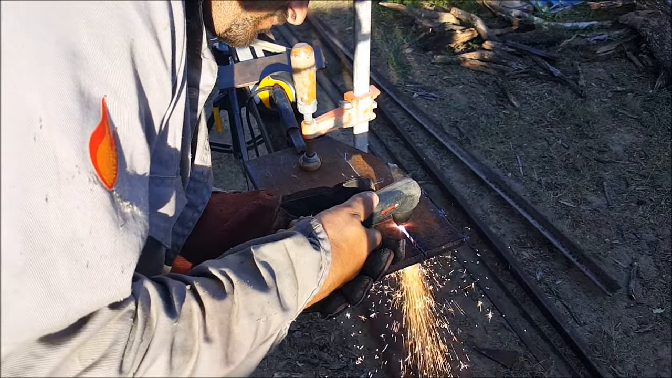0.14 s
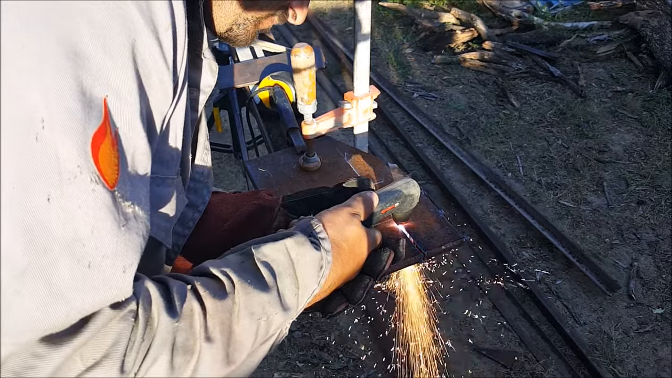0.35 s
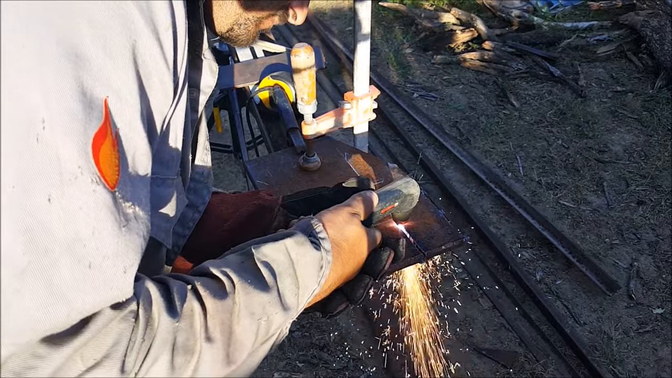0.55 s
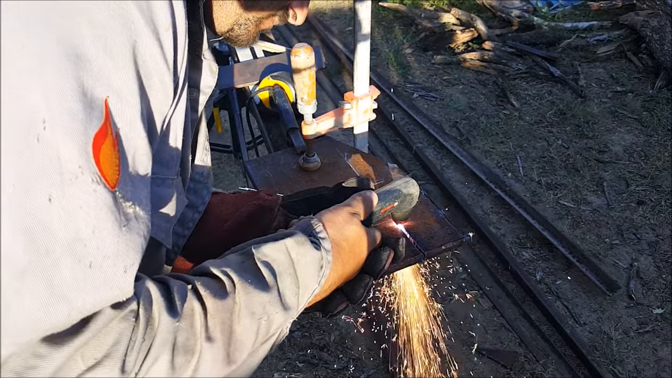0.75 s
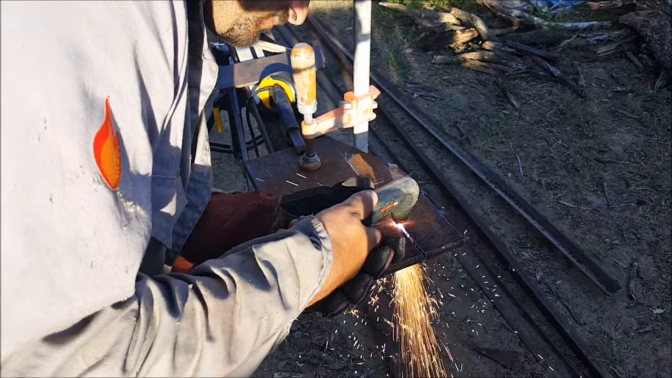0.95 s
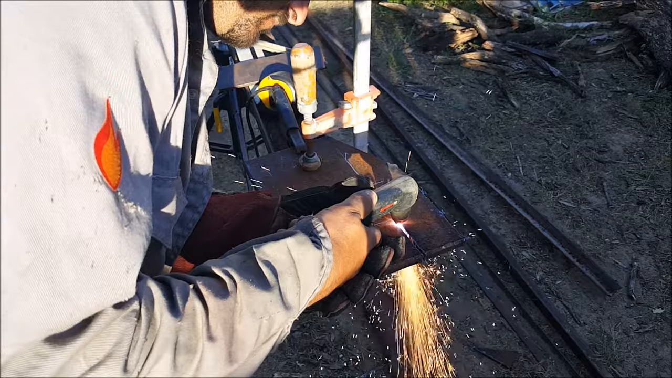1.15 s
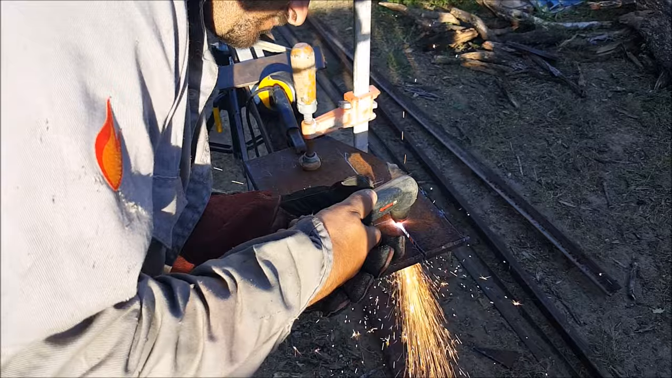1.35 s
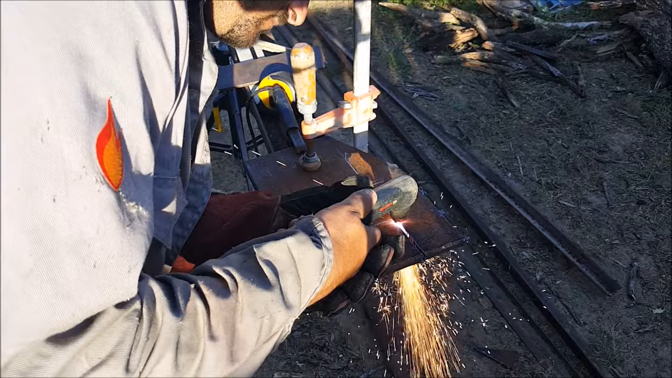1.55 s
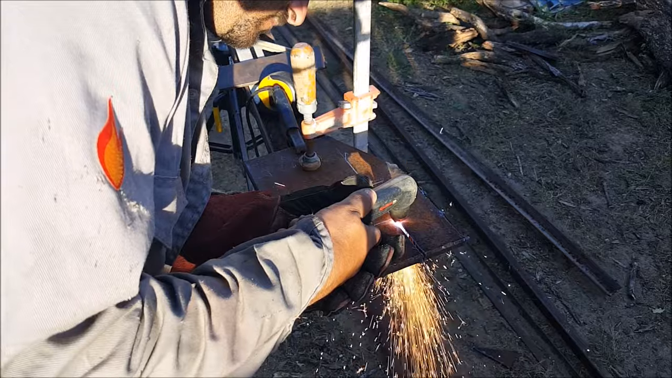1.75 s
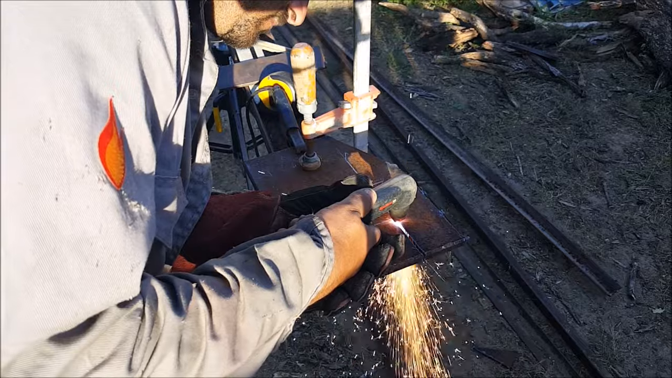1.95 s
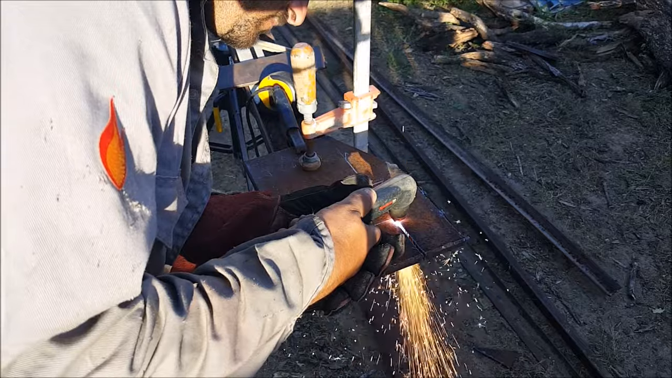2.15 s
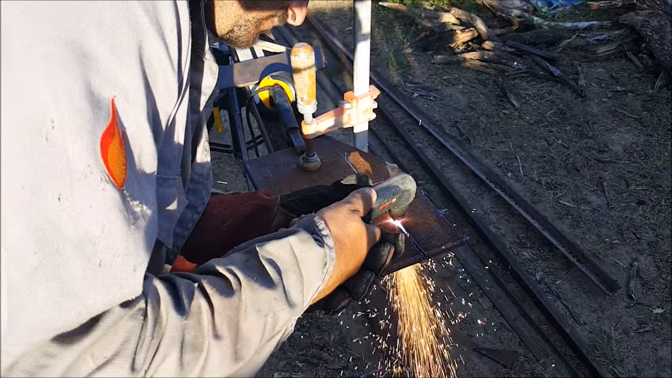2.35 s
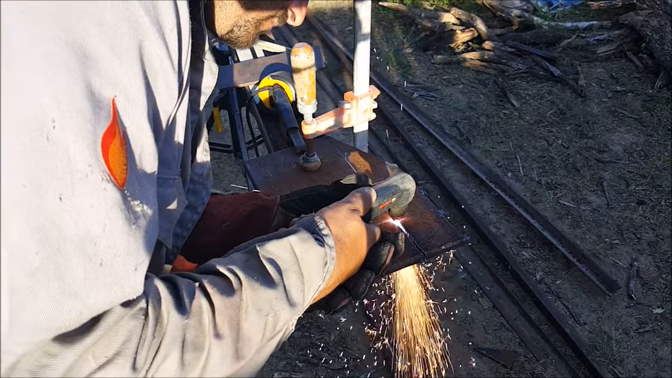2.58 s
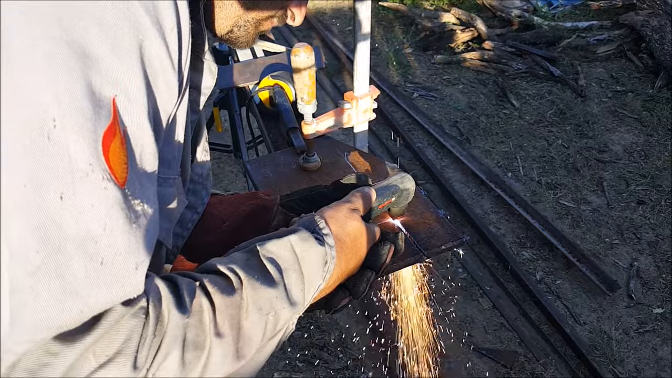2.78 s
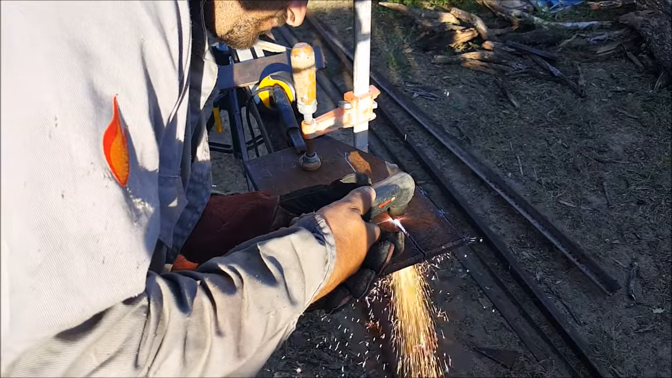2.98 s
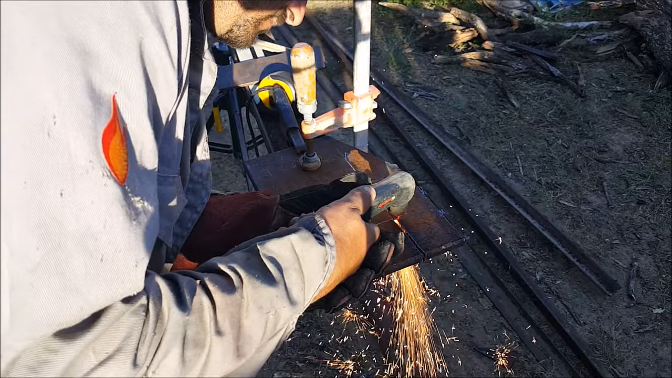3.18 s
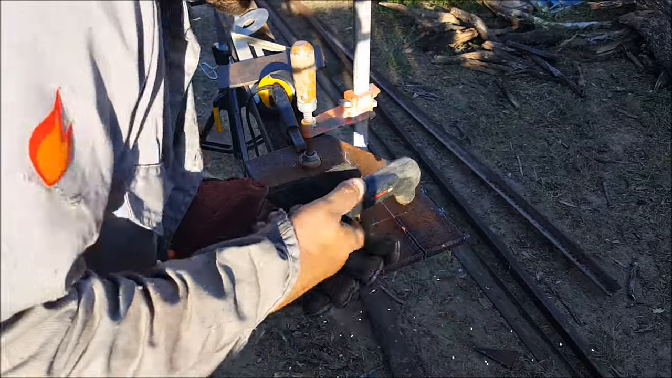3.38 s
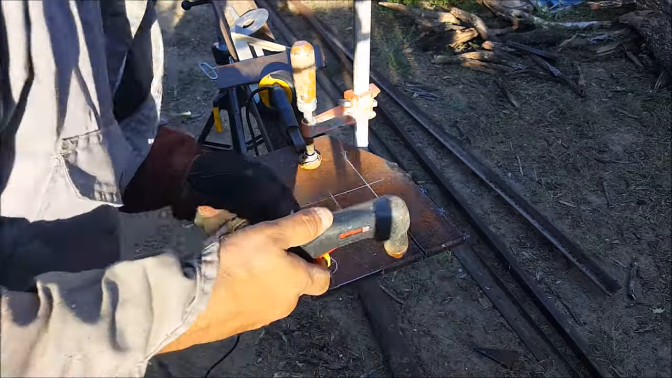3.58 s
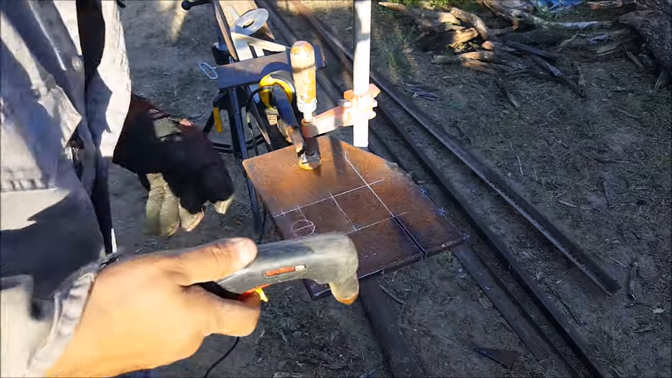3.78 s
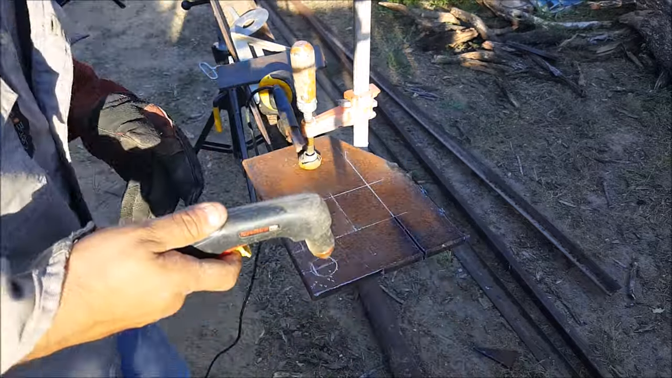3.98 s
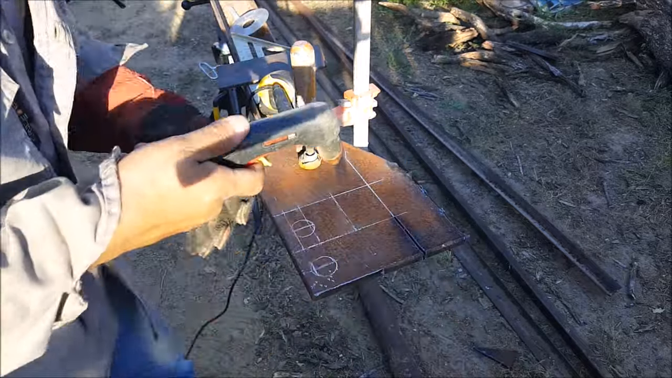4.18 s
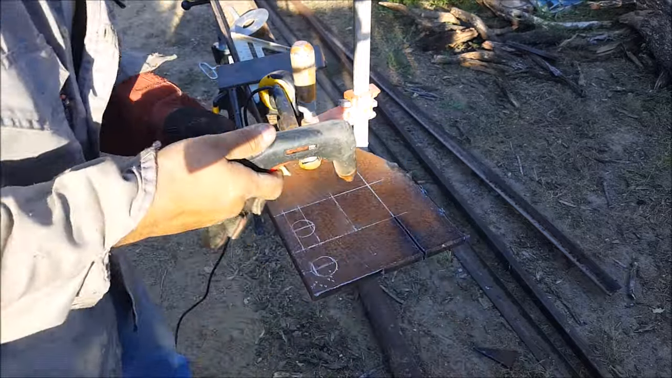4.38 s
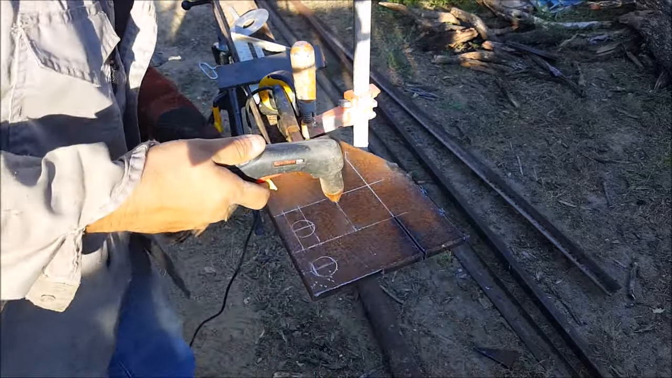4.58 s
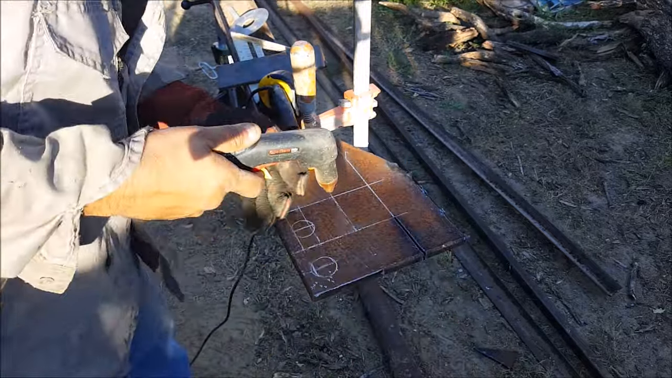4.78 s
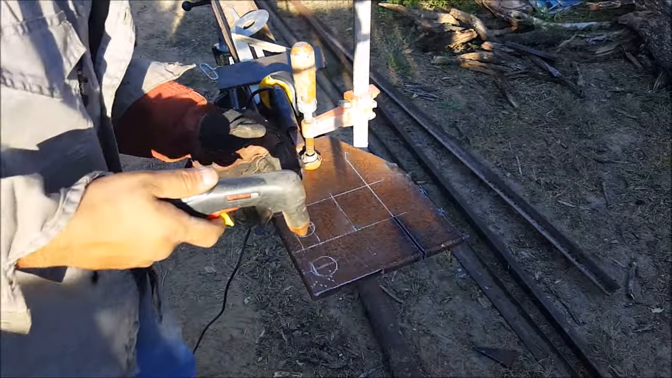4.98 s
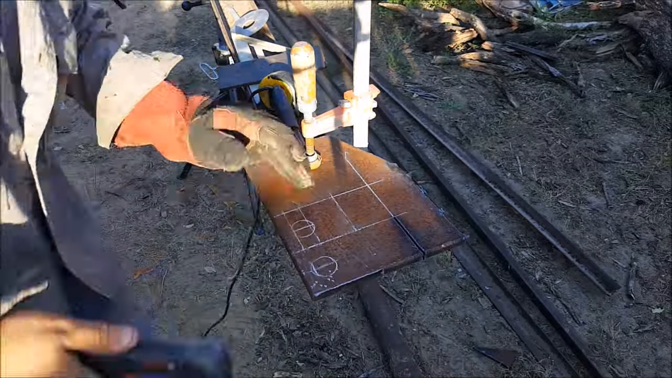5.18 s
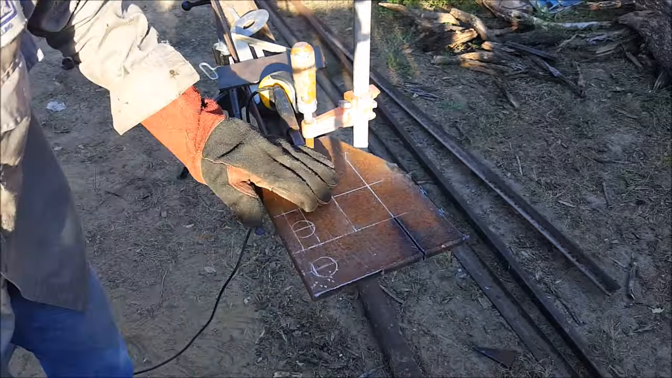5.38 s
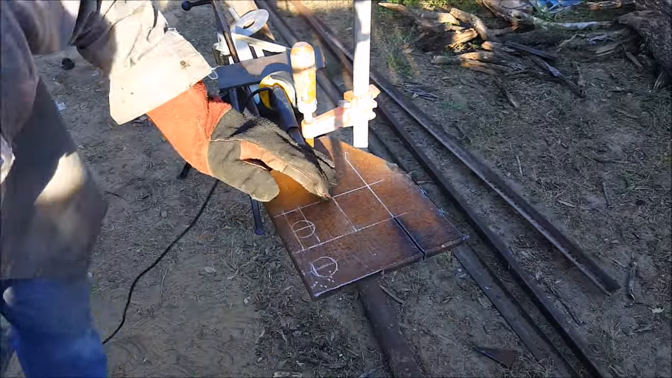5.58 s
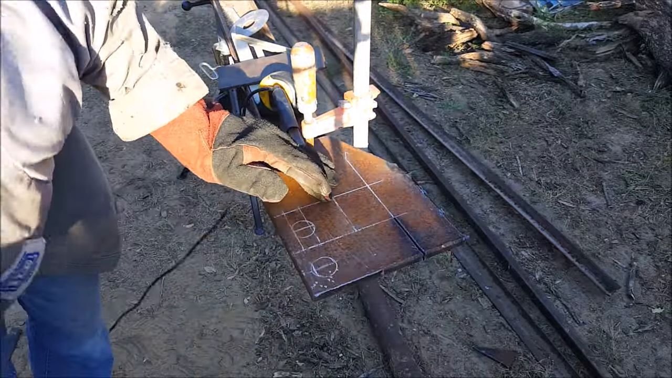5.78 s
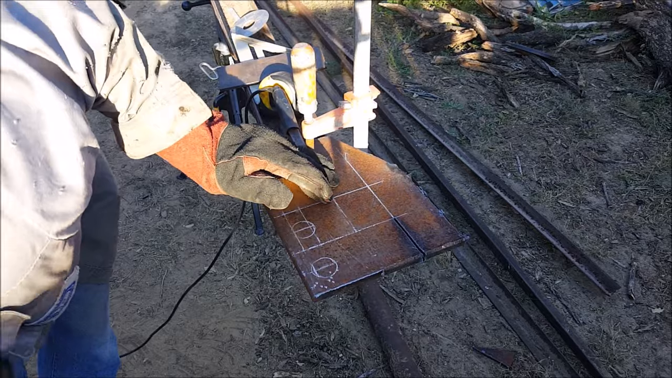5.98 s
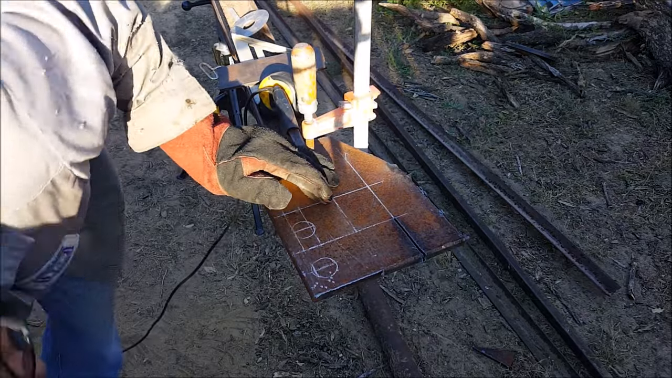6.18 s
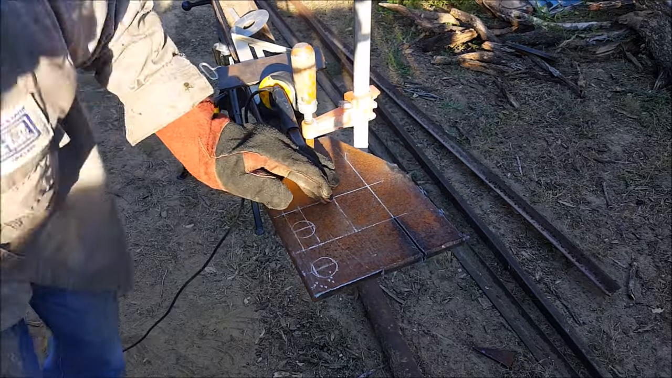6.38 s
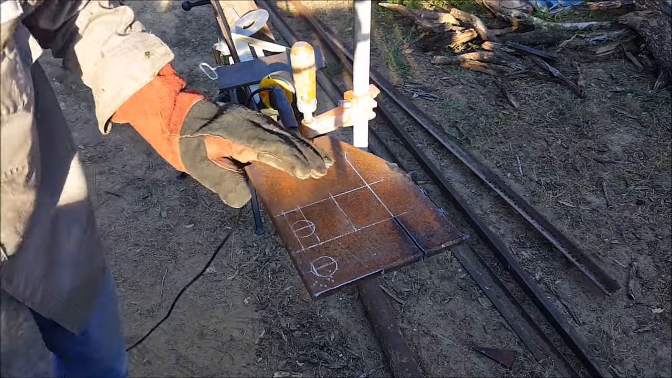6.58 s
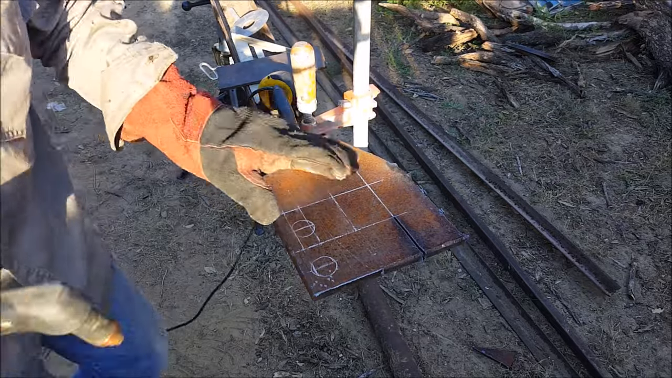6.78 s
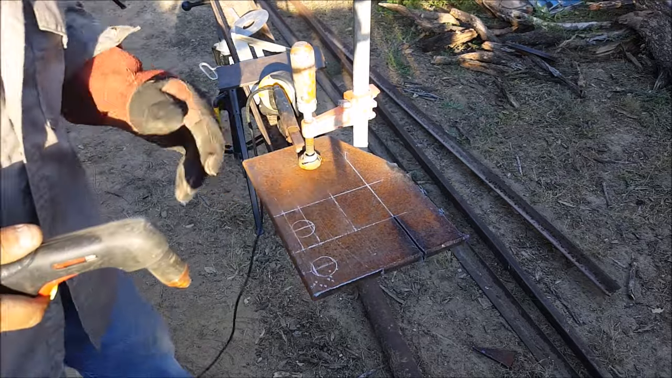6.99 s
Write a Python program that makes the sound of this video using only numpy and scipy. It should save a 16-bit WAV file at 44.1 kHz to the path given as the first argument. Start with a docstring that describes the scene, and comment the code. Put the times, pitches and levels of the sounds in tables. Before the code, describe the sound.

A loud, continuous plasma cut opens at once, its roar flickering with tiny dips and flares. It stops dead after about three seconds. What remains is a thin jet of air from the torch, weak at first, then stronger, fading and returning, with brief fluttering whooshes as it crosses the plate's edge. Low wind buffets the close stereo microphone in dry open air.

```python
"""A plasma torch cuts steel plate outdoors, close to two microphone ports: kicked noise roars in the kerf, jet noise hisses.
The arc goes out with a short tail; cooling air blows on, as jet noise whose colour and delay between the ports
follow the torch as it is lifted, swung over the plate's edge, lowered and brought back. A brief faint whistle, then
bands of rough noise gliding in pitch, come from the jet; lumps of low noise buffet the ports like light wind after
the cut; a machine fan, an unsteady sine, whines faintly."""
import sys
import numpy as np
from scipy import signal
from scipy.fft import rfft, irfft, next_fast_len
from scipy.io import wavfile
from scipy.ndimage import uniform_filter1d, map_coordinates

SR = 44100
rng = np.random.default_rng(int(sys.argv[2]) if len(sys.argv) > 2 else 0)


def file_out(sig):
    """Save sig as 16-bit WAV at sys.argv[1]."""
    # one column per channel
    cols = np.atleast_2d(sig).T
    # limit, then scale
    lim = np.clip(cols, -1, 1)
    pcm = np.round(lim * 32767).astype(np.int16)
    wavfile.write(sys.argv[1], SR, pcm)


N = 310464
TIME_S = np.arange(N) / SR
ARC_OUT_S = 3.294


def amp(db):
    """dB to gain."""
    return 10 ** (np.asarray(db) / 20)


def unit(x):
    """Scale to rms 1 over all channels."""
    return x / np.sqrt(np.mean(x ** 2) + 1e-20)


def columns(rows, hz):
    """Interpolate every column after the frequency on a log frequency axis."""
    row_hz, *cols = np.transpose(rows)
    return [np.interp(np.log(hz + 1), np.log(row_hz + 1), col) for col in cols]


def curves(rows):
    """Interpolate every column after the time, one value per sample."""
    row_s, *cols = np.transpose(rows)
    return [np.interp(TIME_S, row_s, col) for col in cols]


def bumps(rows):
    """Sum bell-shaped rises or dips in dB from rows of centre s, height dB, half-length s (to 1/e)."""
    return sum(db * np.exp(-((TIME_S - s) / half_s) ** 2) for s, db, half_s in rows)


def wobble(knots_per_s):
    """Smooth random curve through normally distributed knots."""
    knots = rng.standard_normal(int(N * knots_per_s / SR) + 4)
    return map_coordinates(knots, [np.arange(N) * knots_per_s / SR])


def filtered(x, response):
    """Multiply the spectrum of x by a response of frequency."""
    m = next_fast_len(N + 8192)
    return irfft(rfft(x, m) * response(np.fft.rfftfreq(m, 1 / SR)), m)[..., :N]


def below(x, edge_hz, power):
    """Zero-phase low-pass, gain one half at the edge."""
    return filtered(x, lambda hz: 1 / (1 + (hz / edge_hz) ** power))


def coloured(x, spectrum):
    """Shape x by a spectrum of Hz, dB rows; rms 1."""
    return unit(filtered(x, lambda hz: amp(columns(spectrum, hz)[0])))


def patchy(patchy_db):
    """Two white noises under one field of random gain in time and pitch."""
    z = signal.stft(rng.standard_normal((2, N)), nperseg=512)[2]
    field = rng.standard_normal(z.shape[1:])
    field = uniform_filter1d(field, size=6, axis=0)
    field = uniform_filter1d(field, size=10, axis=1)
    return signal.istft(z * amp(patchy_db * unit(field)), nperseg=512)[1][:, :N]


def mixed(a, b, alike):
    """Left and right mixes of two independent noises, with correlation alike."""
    angle = np.arccos(np.clip(alike, -1, 1)) / 2
    return np.cos(angle) * a + np.sin(angle) * b, np.cos(angle) * a - np.sin(angle) * b


def blend(alike, patchy_db):
    """Left and right patchy noise that share a part."""
    a, b = patchy(patchy_db)
    return np.array(mixed(a, b, alike))


def nozzle(ports, patchy_db):
    """Jet hiss with the colour, likeness and phase of the two ports; rms 1 between 6 and 10 kHz."""
    m = next_fast_len(N + 8192)
    hz = np.fft.rfftfreq(m, 1 / SR)
    left_db, right_db, alike, lead_rad = columns(ports, hz)
    bass_cut = np.clip(hz / ports[0][0], 0, 1) ** 2  # a small jet makes no bass
    a, b = rfft(patchy(patchy_db), m) * bass_cut
    left, right = mixed(a, b, np.clip(alike, 0, 1))
    left = amp(left_db) * left * np.exp(.5j * lead_rad)
    right = amp(right_db) * right * np.exp(-.5j * lead_rad)
    both = np.array([left, right])
    treble = irfft(both * ((hz > 6000) & (hz < 10000)), m)[:, :N]
    return irfft(both, m)[:, :N] / np.std(treble)


def fan():
    """Blade tone, slightly unsteady in pitch and level, rising out of the quiet."""
    # Each row: pitch in Hz, rms level in dB before the unsteadiness and the rise.
    blade_tones = [(570.6, -62)]
    drift_s = np.cumsum(1 + 0.0015 * wobble(6)) / SR
    tone = 0
    for hz, db in blade_tones:
        tone = tone + amp(db + 2.1 * wobble(8)) * np.sqrt(2) * np.sin(2 * np.pi * hz * drift_s)
    rise_db = np.interp(TIME_S, [3.9, 4.3, 5.3, 5.6], [-13, -4, -1, 0.0])
    return tone * amp(rise_db)


def wind():
    """Lumps of turbulence press on the ports, partly their own; heard only after the arc."""
    # Each row: time in s, buffet level in dB, extra below 85 Hz in dB.
    wind_levels = [(3.3, -75, 0), (3.45, -75, 0), (3.6, -59, -3), (3.95, -61, -2), (4.05, -43, -9),
                   (4.3, -41.5, -7), (4.8, -51, 2), (5.1, -54, 5), (5.6, -47, 1), (6.0, -53, 5),
                   (6.6, -50, 2), (6.8, -57, 4), (7.04, -56, 3)]
    # Buffet spectrum. Each row: frequency in Hz, density in dB per Hz.
    buffet_spectrum = [(15, -42), (35, -6), (60, 0.5), (110, 4), (170, -4), (260, -12.5), (500, -46)]
    # Strong gusts. Each row: centre in s, rise over the buffeting in dB, half-length in s.
    gust_rows = [(4.025, 6, .015), (4.12, 7, .025), (4.55, 6, .02), (4.97, 9, 0.061), (5.32, 8, 0.016),
                 (5.55, 7, .02), (5.62, 10, 0.036), (5.72, 4, .015), (5.875, 10, 0.022), (6.035, 8.5, .015),
                 (6.13, 5, .02), (6.31, 8, .015), (6.72, 5, .02)]
    buffet_db, deep_db = curves(wind_levels)
    lumps_db = 1.5 * wobble(30) + 2.2 * np.array([wobble(22), wobble(22)])
    buffet = amp(lumps_db) * coloured(blend(0.15, patchy_db=0.8), buffet_spectrum)
    buffet = buffet + (amp(deep_db) - 1) * below(buffet, 85, 6)
    buffet = buffet / np.std(buffet.mean(axis=0))
    return (TIME_S > ARC_OUT_S) * amp(buffet_db + bumps(gust_rows)) * buffet


def sweeps():
    """A brief faint whistle, then bands of rough flutter gliding in pitch, as the jet crosses an edge."""
    # Each row: peak in s, rise in s, fall in s, level in dB, first pitch in Hz, last pitch in Hz,
    # spread in octaves.
    sweep_rows = [(3.45, .03, .03, -54, 1590, 1590, .025), (3.626, .018, .035, -44, 1050, 600, .55),
                  (4.155, .025, .035, -37, 1100, 400, 1.1), (5.075, .045, .045, -38, 400, 800, .5),
                  (5.14, .028, .028, -33, 1000, 800, .95)]

    def band(x, pitch_hz, spread_oct):
        """Noise in a bell-shaped band around the pitch, rms 1."""
        return unit(filtered(x, lambda hz: np.exp(-.5 * (np.log2((hz + 1) / pitch_hz) / spread_oct) ** 2)))

    out = np.zeros((2, N))
    for peak_s, rise_s, fall_s, db, first_hz, last_hz, spread_oct in sweep_rows:
        rough = blend(0.92, patchy_db=1.5) * amp(2.5 * wobble(120))
        first = band(rough, first_hz, spread_oct)
        last = band(rough, last_hz, spread_oct)
        since_s = TIME_S - peak_s
        glide = np.clip((since_s + rise_s) / (rise_s + fall_s), 0, 1)
        envelope = np.exp(-(since_s / np.where(since_s < 0, rise_s, fall_s)) ** 2)
        out += amp(db) * envelope * ((1 - glide) * first + glide * last)
    return out


def cooling_air():
    """Cold air jets from the nozzle; its colour and delay between the ports follow the torch."""
    # Jet at the ports, torch not turned away, then fully turned away. Each row: frequency in Hz,
    # left in dB, right in dB, likeness 0-1, left lead in radians.
    raised_ports = [(300, -14, -15.5, 0.51, 0.3), (700, -17.1, -18.3, 0.7, -0.4),
                    (1500, -13.0, -15.3, 0.73, -0.4), (3000, -11.8, -11.3, 0.72, -0.7),
                    (4300, -12.5, -8.5, 0.66, -0.9), (5000, -16.5, -7.0, 0.17, -1.4),
                    (5600, -10.3, -4.5, 0.6, -0.4), (6600, -12.3, -1.4, 0.25, 0.1),
                    (7000, -10.1, -1.1, 0.46, 0.9), (7500, -8.0, -4.7, 0.52, 0.2),
                    (8400, -4.1, 0.0, 0.68, 0.2), (10600, -12.3, -12.8, 0.45, 0.2),
                    (13500, -8.2, -4.3, 0.57, -0.5), (15600, -8.6, -4.4, 0.37, -0.4)]
    lowered_ports = [(300, -14, -15.5, 0.4, -0.2), (700, -15, -16, 0.7, -0.3),
                     (1500, -9.4, -11.0, 0.61, -1.3), (2800, -4.6, -6.3, 0.16, -2.2),
                     (4200, -6.1, -5.9, 0.44, -1.1), (5000, -6.0, -6.2, 0.51, -1.3),
                     (5700, -7.3, -6.1, 0.22, -1.7), (6900, -6.6, -1.3, 0.38, -1.5),
                     (7500, -4.2, -1.8, 0.39, -1.5), (8400, -0.6, 0.0, 0.52, -1.7),
                     (9500, -5.2, -3.3, 0.39, -2.3), (10600, -7.1, -5.9, 0.38, -1.9),
                     (13000, -4.2, -4.7, 0.31, -2.0), (15600, -2.4, -10.2, 0.3, -4.7)]
    # Each row: time in s, level in dB, extra below 1.3 kHz in dB, extra 1.3-4 kHz in dB,
    # extra above 10 kHz in dB.
    air_levels = [(3.31, -31.5, -12, 1, -5), (3.38, -34.5, -4, 2, -3), (3.5, -42.5, 8, 6, -2),
                  (3.65, -41.5, 5, 0, 0), (3.75, -42.5, -8, 1, -3), (3.87, -43, -3, .5, -4),
                  (4.0, -34.5, -5, 1, 3), (4.12, -30.5, 1.5, 1.5, 2.5), (4.35, -28.5, -1, 1, 1),
                  (4.5, -26, -1, -0.5, -1.5), (4.9, -26, 0, 0, -1), (5.22, -28, -4.5, 0.5, -2),
                  (5.4, -32, 2, -3, 0.5), (5.65, -36, 0.5, 2, 1.5), (6.0, -36, -2.5, 0, 0.5),
                  (6.4, -35, -1, 1, 1), (6.7, -28.5, -4.5, -2.5, -2), (7.04, -26, -8, -4, -2)]
    # Torch moves. Each row: time in s, turned away 0-1, right port lag in ms.
    torch_moves = [(3.3, 0, -.05), (3.7, 0, -.03), (3.95, 0, .045), (5, 0, .045), (5.2, .1, .1),
                   (5.45, .6, .2), (5.7, 1, .34), (6.35, 1, .33), (6.65, .5, .27), (7.04, .3, .19)]
    # Lean of the treble above 10 kHz. Each row: time in s, left minus right in dB.
    treble_lean = [(3.3, -1), (3.9, 1), (4.15, 0), (4.35, -2.5), (5.1, 1.5), (5.6, -2), (6.3, 1), (6.7, 4),
                   (7.04, 2)]
    jitter_half_samples = .7  # while half turned

    level_db, deep_db, low_db, top_db = curves(air_levels)
    away, lag_ms = curves(torch_moves)
    lean_db, = curves(treble_lean)
    raised = np.sqrt(1 - away) * nozzle(raised_ports, patchy_db=1.33)
    lowered = np.sqrt(away) * nozzle(lowered_ports, patchy_db=1.64)
    jet = raised + lowered

    deep = below(jet, 1300, 6)
    low = below(jet, 4000, 6) - deep
    top = jet - below(jet, 10200, 12)
    top_db = top_db + np.outer([.5, -.5], lean_db)  # the treble leans slowly from port to port
    jet = jet + (amp(deep_db) - 1) * deep + (amp(low_db) - 1) * low + (amp(top_db) - 1) * top

    fine = signal.resample_poly(jet, 2, 1, axis=1)  # twice the rate, so that delays keep the treble
    half_lag = lag_ms / 1000 * SR  # half the lag, in samples of the doubled rate
    # The delay jitters at random while the torch is partly turned.
    shift = half_lag + jitter_half_samples * 2 * np.sqrt(away * (1 - away)) * wobble(60)
    left = map_coordinates(fine[0], [2 * np.arange(N) + shift], mode="mirror")
    right = map_coordinates(fine[1], [2 * np.arange(N) - shift], mode="mirror")
    return (TIME_S > ARC_OUT_S) * amp(level_db + 0.15 * wobble(11)) * np.array([left, right])


def dying(tail_db, t60_s):
    """Gain 1 until the arc stops; then a drop and a decay, as nearby things answer."""
    since_s = TIME_S - ARC_OUT_S
    return np.where(since_s < 0, 1, amp(tail_db - 60 * np.maximum(since_s, 0) / t60_s))


def arc():
    """Hot gas tears through the kerf as a dense hail of pressure kicks, with nozzle hiss; it stops dead."""
    # Roar spectrum. Each row: frequency in Hz, density in dB per Hz.
    roar_spectrum = [(20, -47), (31, -52), (62, -21.5), (125, -13), (200, -8.5), (300, -5.5), (420, 1),
                     (600, 0), (1000, -2), (2000, -6), (3200, -11), (4500, -22.5), (7000, -40)]
    # Nozzle at the ports. Each row: frequency in Hz, left in dB, right in dB, likeness 0-1,
    # left lead in radians.
    cutting_ports = [(4300, -5.7, -4.5, 0.21, -0.8), (5100, -9.6, -4.4, 0.2, -1.7),
                     (5700, -10.1, -4.5, 0.28, -1.0), (6300, -9.5, -2.3, 0.52, -1.2),
                     (6900, -11.2, 0.0, 0.45, -0.8), (7400, -11.5, -6.1, 0.41, -0.5),
                     (7900, -10.0, -4.2, 0.59, -0.8), (8400, -8.8, -4.5, 0.67, -0.8),
                     (9500, -13.4, -8.7, 0.5, -0.8), (10700, -15.0, -12.3, 0.41, -2.0),
                     (12000, -14.4, -9.8, 0.33, -2.1), (13500, -12.3, -8.9, 0.45, -2.5),
                     (15000, -9.7, -3.7, 0.57, -2.8), (15700, -9.6, -4.2, 0.65, -2.7)]
    # The roar dips briefly. Each row: centre in s, change of the bright roar in dB, half-length in s.
    dip_rows = [(.255, 0, .02), (.565, -7.5, 0.02), (.94, -4.5, .025), (1.118, -7.5, 0.027),
                (1.29, -3, 0.025), (1.52, -4.5, .03), (1.715, -5, 0.023), (2.116, -8.5, 0.04),
                (2.33, -6.5, 0.023), (2.425, -5.5, 0.023), (2.53, -3, .02), (2.76, -3, 0.015),
                (2.834, -6, 0.016), (2.907, -4.5, 0.014), (3.0, -6, 0.02), (3.13, -3, .02)]
    # Strongest flares of the bright roar. Each row: centre in s, rise in dB, half-length in s.
    flare_rows = [(.165, 3, .04), (.615, 3, .02), (1.21, 2.5, 0.034), (1.668, 4.5, .025), (1.95, 4, 0.044),
                  (2.5, 2, 0.022), (2.7, 5, 0.045), (2.96, 2, .02)]
    # Levels before dips and swells: roar layers rms, nozzle rms at 6-10 kHz.
    deep_level_db, bright_level_db, nozzle_level_db = -17.5, -19.5, -25.5
    deep_share, nozzle_share = 0.53, 0.084  # how much of a dip or swell these layers follow
    tail_db, deep_t60_s, bright_t60_s = -13, 0.073, 0.14

    flow_db = bumps(dip_rows) + 0.7 * wobble(14)
    lull_db = bumps([(0, -5.5, 0.069)])  # the roar comes up from a lull
    flare_db = bumps(flare_rows) + 0.52 * wobble(16)

    # Random sputter shared by both ports; rough kicks of 2 samples separate in each.
    sputter_db = -1.1 * np.abs(wobble(60)) + 1.4 * wobble(450)
    kicks_db = 5.2 * rng.standard_normal((2, N // 2 + 1)).repeat(2, axis=1)[:, :N]
    left, right = blend(0.2, patchy_db=2.06) * amp(sputter_db + kicks_db)
    roar = coloured(np.array([np.roll(left, 3), right]), roar_spectrum)  # the right port is a little nearer
    deep = below(roar, 1300, 4)
    bright = roar - deep
    hiss = nozzle(cutting_ports, patchy_db=1.33) * amp(0.24 * wobble(30))

    deep = amp(deep_level_db + deep_share * flow_db + lull_db) * unit(deep)
    bright = amp(bright_level_db + flow_db + lull_db + flare_db) * unit(bright)
    hiss = amp(nozzle_level_db + nozzle_share * flow_db) * hiss
    return (deep + hiss) * dying(tail_db, deep_t60_s) + bright * dying(tail_db, bright_t60_s)


def scene():
    """Sum all sources at the two ports."""
    return fan() + wind() + sweeps() + cooling_air() + arc()


def record(dry):
    """Gain control leans on loud moments, peaks are rounded off, nothing is kept above the band limit."""
    threshold_db, gain_db_per_db, peak, top_hz = -14.4, -.35, .9, 15830
    power = np.abs(uniform_filter1d(np.mean(dry ** 2, axis=0), size=1100))
    over_db = np.maximum(10 * np.log10(power + 1e-12) - threshold_db, 0)
    held = dry * amp(uniform_filter1d(gain_db_per_db * over_db, size=400))
    rounded = held / (1 + np.abs(held / peak) ** 4) ** (1 / 4)
    return filtered(rounded, lambda hz: hz < top_hz)


dry = scene()
out = record(dry)
file_out(out)
```